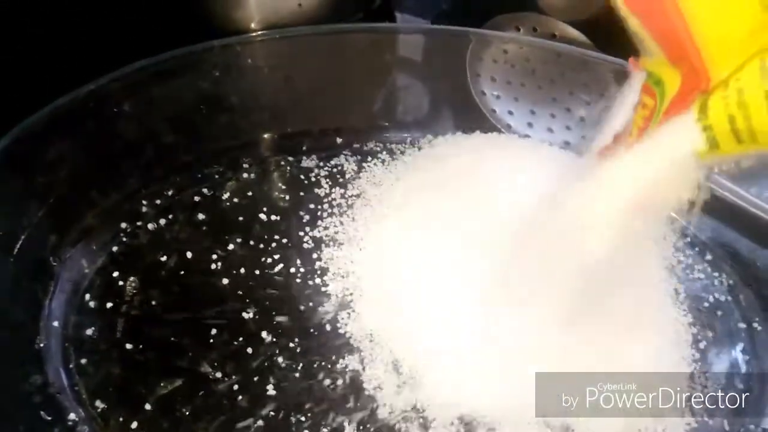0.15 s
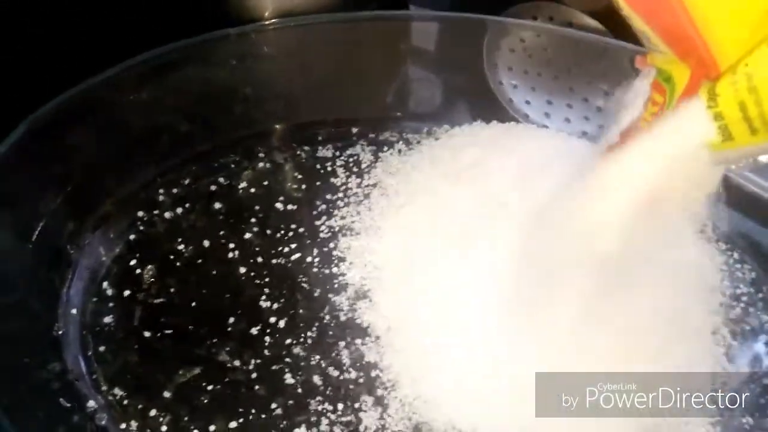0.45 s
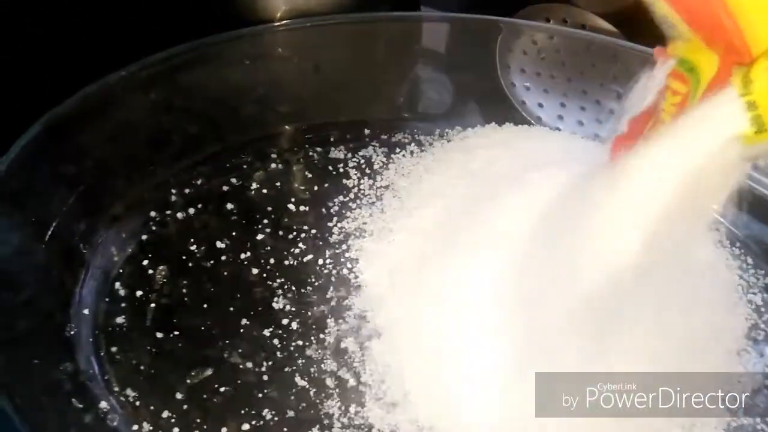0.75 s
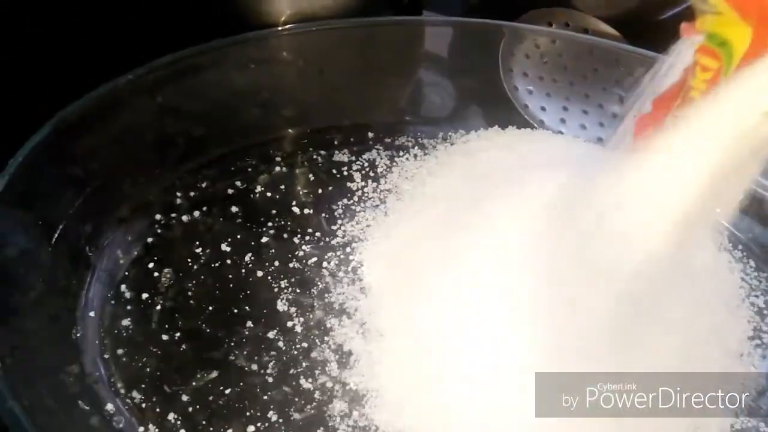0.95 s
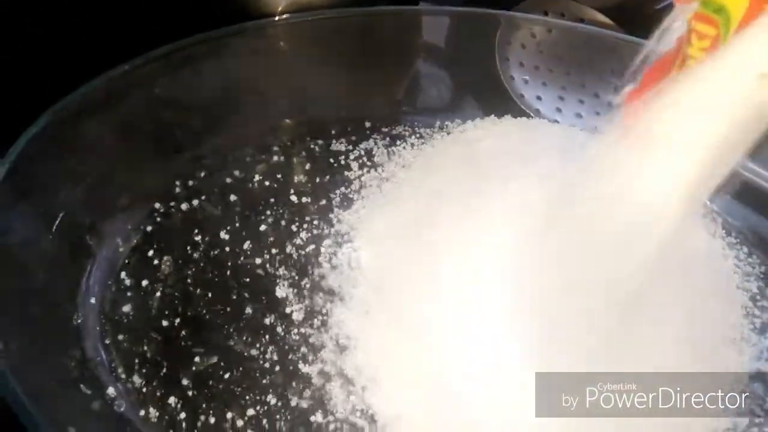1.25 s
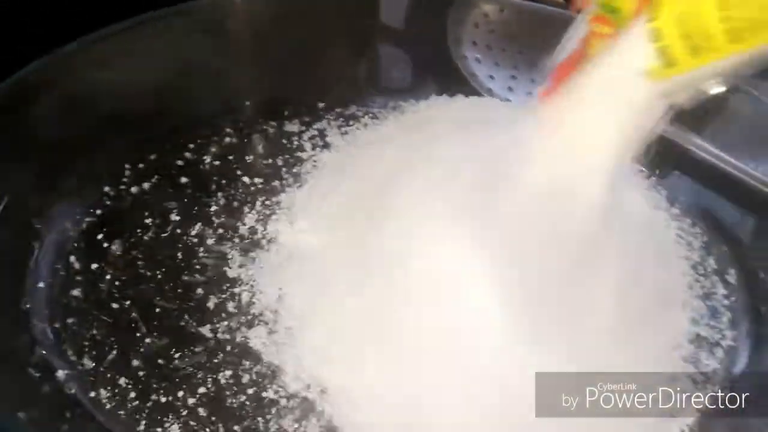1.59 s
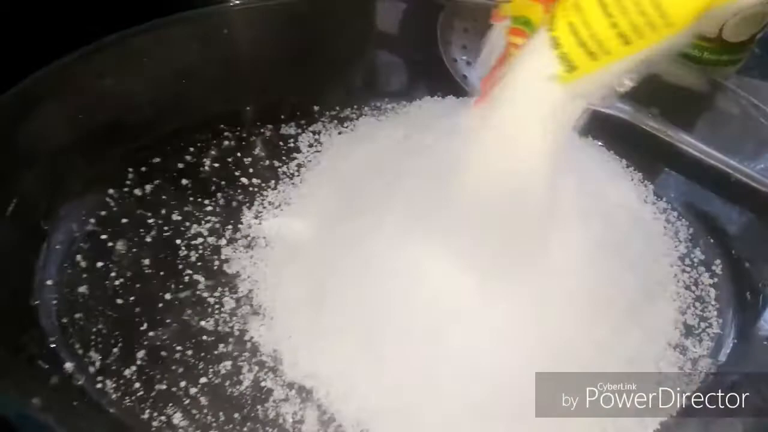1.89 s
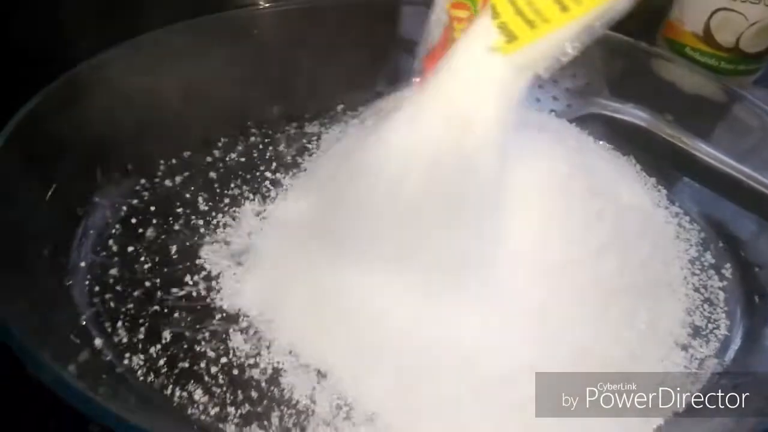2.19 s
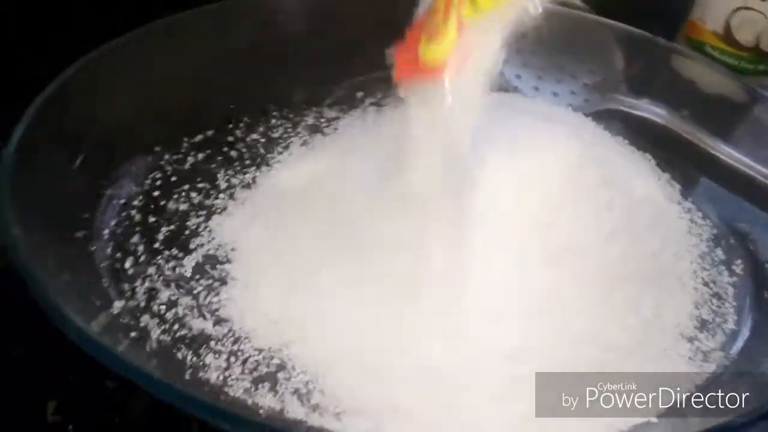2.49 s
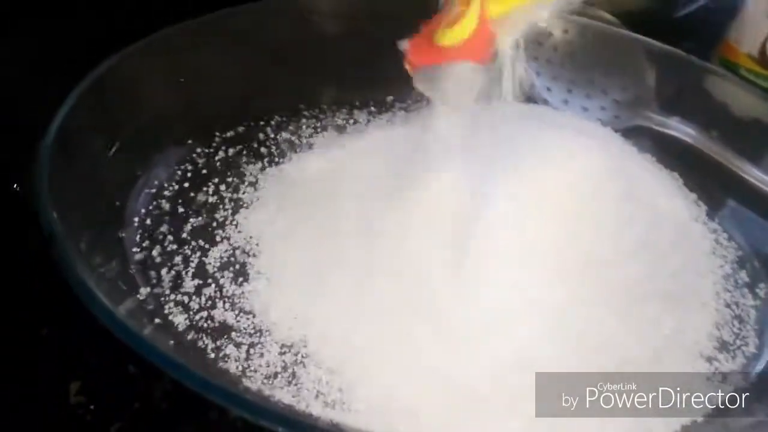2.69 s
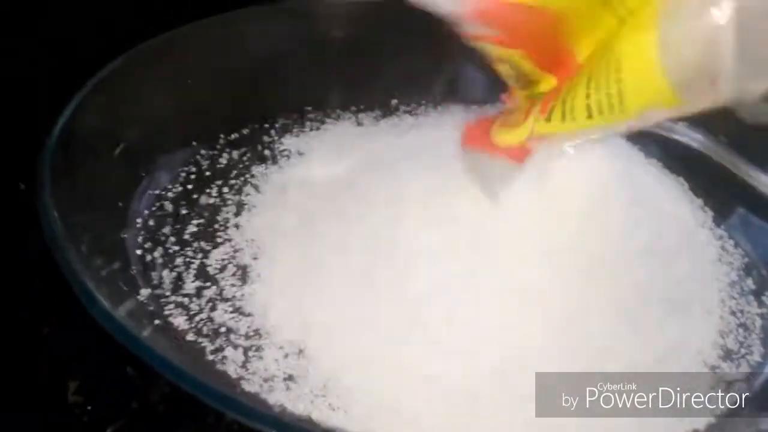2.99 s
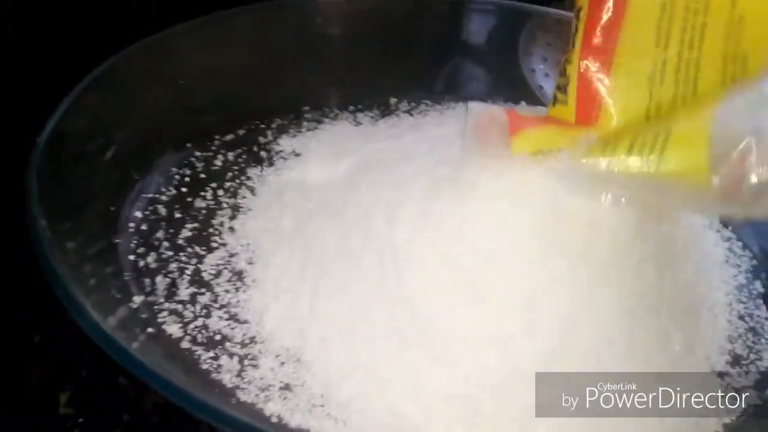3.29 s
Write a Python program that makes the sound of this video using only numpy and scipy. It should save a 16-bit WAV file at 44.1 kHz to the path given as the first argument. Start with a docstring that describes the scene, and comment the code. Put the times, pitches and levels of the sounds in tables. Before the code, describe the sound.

Hard little granules pour from a plastic packet into a glass bowl, close and mono. A dense, bright, grainy hiss swells slightly until 0.8 s, its tone shifting as the heap grows, with small plastic snaps at 0.2 and 0.8 s. After 2.5 s it thins raggedly; shaken spurts burst around 3.0-3.2 s, then a sharp packet snap, dull bumps and fading patter by 3.4 s. Faint rustle and low kitchen hum lie beneath.

```python
"""Pellets poured into a glass bowl

Small hard pellets pour from a plastic packet onto a growing heap, close to a mono microphone. Random clicks,
up to thousands a second, merge with smooth rolling noise into a hiss; filters crossfaded with the heap give
the changing notches of the bowl's echoes. At the end the packet is shaken and the last pellets leave in spurts.
Damped sines make its snaps and bumps, filtered noise its rustle and the low hum of the kitchen."""
import sys
import numpy as np
from scipy import signal
from scipy.io import wavfile
from scipy.ndimage import uniform_filter1d

SR = 44100
rng = np.random.default_rng(int(sys.argv[2]) if len(sys.argv) > 2 else 0)


def gain_from_db(level_db):
    """Turn a decibel level (scalar or array-like) into a linear amplitude factor."""
    decades = np.asarray(level_db, float) / 20
    return 10 ** decades


def waveform_to_disk(signal):
    """Save audio, clipped to [-1, 1], as 16-bit WAV at the path in sys.argv[1]."""
    frames = np.transpose(np.atleast_2d(signal))
    scaled = np.clip(frames, -1, 1) * 32767
    samples = np.round(scaled).astype(np.int16)
    wavfile.write(sys.argv[1], SR, samples)


N = 152145


def evened(x):
    """Scales to rms 1."""
    return x / np.sqrt(np.mean(x ** 2) + 1e-20)


def along(rows):
    """Reads the columns of a curve at every sample."""
    s, *columns = np.transpose(rows)
    return [np.interp(np.arange(N) / SR, s, c) for c in columns]


def colour(x, points, size=4096):
    """Causal minimum-phase filter of unit energy with the given spectrum."""
    point_hz, point_db = np.transpose(points)
    hz = abs(np.fft.fftfreq(size, 1 / SR))
    db = np.interp(np.log(hz + 1), np.log(point_hz + 1), point_db)
    log_gain = np.log(gain_from_db(np.maximum(db, -100)))
    # the Hilbert transform of the log gain gives the phase
    response = np.exp(np.conj(signal.hilbert(log_gain)))
    taps = np.fft.ifft(response).real[:size // 2]
    return signal.oaconvolve(x, taps / np.linalg.norm(taps))[:N]


def drift(hz):
    """Slow random curve of rms 1: noise through two one-pole low-passes at hz."""
    b, a = signal.butter(1, hz, fs=SR)
    once = signal.lfilter(b, a, rng.standard_normal(N))
    return evened(signal.lfilter(b, a, once))


def patchy(patch_db):
    """Noise whose level drifts in patches of time and pitch."""
    real, imag, patch = rng.standard_normal((N // 128 + 5, 257, 3)).T
    patch = uniform_filter1d(patch, size=6, axis=0)  # over pitch
    patch = evened(uniform_filter1d(patch, size=16, axis=1))  # over time
    spectrum = (real + 1j * imag) * gain_from_db(patch_db * patch)
    return evened(signal.istft(spectrum, nperseg=512, noverlap=384)[1][:N])


def hum():
    """Low lumpy rumble of the kitchen: low-filtered noise of drifting level."""
    # spectrum of the rumble: hz, relative level_db per Hz
    hum_colour = [(12, -48), (30, -12), (59, 5), (75, -0.5), (97, -8), (140, -10.5), (200, -18.5),
                  (260, -30), (440, -120)]
    level_db, lump_db, lump_hz = -67.5, 3, 3.7
    lumpy = rng.standard_normal(N) * gain_from_db(lump_db * drift(lump_hz))
    return gain_from_db(level_db) * evened(colour(lumpy, hum_colour, size=16384))


def handling():
    """Low lumpy rustle of the packet in the hand: filtered noise, its bottom lifted separately."""
    # rustle level before the bottom lift: time_s, level_db
    rustle_level = [(0.0, -64.5), (0.15, -76), (0.19, -64.5), (0.59, -61), (1.18, -68), (1.58, -61),
                    (2.05, -75), (2.13, -69.5), (2.91, -72.5), (3.17, -58.5), (3.4, -61.5), (3.45, -63.5)]
    # rustle spectrum: hz, relative level_db per Hz
    rustle_colour = [(53, -25), (90, -11.5), (270, -2), (306, -1), (351, -4.5), (525, 0.5), (614, -7),
                     (800, -0.5), (1040, -15), (1760, -120)]
    # lift of the rustle's bottom: time_s, lift_db
    bottom_lift = [(0, 3.5), (.7, -11), (1.1, 3.5), (1.6, 4), (2.3, 5), (2.8, 1), (3.45, 5)]
    patch_db, lump_db, lump_hz, split_hz = 2.9, 3, 7.2, 226
    lumpy = patchy(patch_db) * gain_from_db(lump_db * drift(lump_hz))
    rustle = evened(colour(lumpy, rustle_colour))
    low = signal.oaconvolve(rustle, signal.firwin(1025, split_hz, fs=SR), "same")
    level_db, lift_db = along(rustle_level)[0], along(bottom_lift)[0]
    return gain_from_db(level_db) * (rustle - low + low * gain_from_db(lift_db))


def thumps():
    """Dull bumps of the packet: low sines that rise softly and decay exponentially."""
    # bumps: start_s, level_db before the soft rise, pitch_hz, t60_s
    bumps = [(1.914, -58, 306, 0.089), (2.108, -53.5, 291, 0.093), (2.665, -50.5, 75.5, 0.19),
             (3.28, -48.5, 240, 0.065), (3.358, -46, 305, 0.094), (3.383, -58, 202, 0.069)]
    rise_s = 0.0074
    out, t = np.zeros(N), np.arange(SR // 5) / SR
    for start_s, level_db, pitch_hz, t60_s in bumps:
        decay = gain_from_db(level_db - 60 * t / t60_s)
        bump = decay * np.sin(2 * np.pi * pitch_hz * t) * np.minimum(t / rise_s, 1)
        part = out[round(start_s * SR):][:len(t)]
        part += bump[:len(part)]
    return out


def snaps():
    """Snapping folds of the packet ring the same few damped modes; thin film radiates no bass."""
    # folds: start_s, level_db (scales half the sum of the modes), pitch_hz, t60_s
    folds = [(.1988, -27, 987, .013), (.7790, -27.5, 1000, .012), (3.3295, -37, 1400, .012),
             (3.3346, -27.5, 1100, .009), (3.383, -39, 1500, .02), (3.387, -39, 1480, .03)]
    # modes of a fold: multiple of pitch_hz, relative level_db
    modes = [(.95, 2), (1.3, -1), (1.7, 1), (2.2, 3), (2.7, 0), (3.1, 1), (3.8, -9)]
    rise_s, bottom_hz = .0002, 800
    out, t = np.zeros(N), np.arange(2000) / SR
    for start_s, level_db, pitch_hz, t60_s in folds:
        ring = sum(gain_from_db(mode_db - 60 * t / t60_s) * np.sin(2 * np.pi * multiple * pitch_hz * t)
                   for multiple, mode_db in modes)
        ring = gain_from_db(level_db) * ring * np.minimum(t / rise_s, 1) / 2
        part = out[round(start_s * SR):][:len(t)]
        part += ring[:len(part)]
    return signal.sosfilt(signal.butter(4, bottom_hz, "high", fs=SR, output="sos"), out)


def bright(x):
    """Adds a moving resonance: shift down, smooth, shift back."""
    # narrow band, mostly climbing as the heap nears the packet: time_s, centre_hz, gain_db
    band = [(1.6, 5900, -6), (1.95, 5670, -6), (2.3, 6100, 7), (2.55, 6510, 1), (2.72, 6560, -6),
            (2.8, 6500, -25)]
    width_hz = 94
    centre_hz, gain_db = along(band)
    turn = np.exp(2j * np.pi * np.cumsum(centre_hz) / SR)
    pole = np.exp(-np.pi * width_hz / SR)
    smooth = signal.lfilter([1 - pole], [1, -pole], x / turn)
    return x + gain_from_db(gain_db) * 2 * (turn * smooth).real


def stream():
    """Clumped clicks of falling pellets plus rolling hiss, coloured by the state of the heap."""
    # heap: time_s, stage (0 low, 1 rising, 2 high, 3 packet lowered onto it, 4 packet nearly empty)
    heap_stage = [(0, 0), (1.2, 0.54), (1.6, .5), (1.95, 1.0), (2.15, 1.2), (2.35, 1.95), (2.7, 2),
                  (2.85, 3), (3.0, 3), (3.24, 3), (3.28, 3.5), (3.45, 4)]
    # steady pour, then spurts: time_s, level_db before colouring, lift_db of the lower mids
    steady = [(0, -37, -0.5), (.1, -35, -2), (.2, -34, -0.5), (.5, -33, 0), (.8, -31.5, 0.5),
              (1.3, -32.5, 1.5), (1.8, -33.5, 3), (2.2, -34.5, 0.5), (2.45, -35, -3)]
    spurts = [(2.52, -35.5, -1), (2.56, -37, -0.5), (2.62, -40.0, -1), (2.66, -36.5, -1.5),
              (2.72, -40.5, 2.5), (2.745, -44.5, 1.5), (2.78, -47.5, 3), (2.81, -43, 0.5), (2.84, -43.5, 5),
              (2.867, -38, -2), (2.895, -40.5, 2.0), (2.91, -46.5, 2.5), (2.935, -52.5, 6),
              (2.955, -48.5, 5), (2.975, -36, 4), (3.0, -39, 2), (3.025, -31, 1.5), (3.05, -31, -4),
              (3.075, -36, 0.5), (3.11, -40.5, 1.5), (3.133, -39, 1), (3.147, -27.5, 0.5),
              (3.18, -30, -2.5), (3.225, -36.0, 2), (3.246, -43, 0.5), (3.275, -43.5, -1),
              (3.285, -38.5, 0), (3.305, -37, -2), (3.325, -39, -1), (3.346, -43.5, 3), (3.378, -44, 1),
              (3.386, -42.5, 8.5), (3.402, -47.5, 0.5), (3.42, -54, 4), (3.435, -50, 5), (3.45, -57, 4)]
    # colour of a click at the microphone, one table per stage: hz, relative level_db per Hz
    low_heap = [(120, -60), (200, -51), (320, -21.5), (419, -24), (451, -25), (581, -25.5), (912, -12.5),
                (1490, -14.5), (2060, -8), (2510, -15), (2900, -9), (3290, -12), (3600, -5.5), (4240, -5.5),
                (4640, -7.5), (5760, 0), (8410, -19), (14300, -27)]
    rising_heap = [(120, -68), (200, -36), (309, -23), (419, -44), (443, -50), (761, -34), (880, -13.5),
                   (1090, -22.5), (1170, -16), (1510, -14), (1630, -21), (1880, -15.5), (2170, -10),
                   (3350, -13.5), (4310, -0.5), (5760, 2.5), (8410, -15.5), (14300, -25.5)]
    high_heap = [(120, -53), (200, -24), (300, -45), (430, -51), (540, -17.5), (620, -29.5), (770, -28.5),
                 (950, -14.5), (1150, -15.5), (1270, -24.5), (1400, -11), (1650, -10.5), (1980, -21),
                 (2400, -2), (2800, -10.5), (3300, -3), (3750, -10.5), (4750, 0.5), (5500, -1),
                 (6300, -3.5), (7300, -13.5), (14300, -30)]
    packet_down = [(120, -39), (200, -28), (412, -32.5), (530, -19.5), (613, -30), (880, -22.5),
                   (946, -9.5), (1050, -15), (1150, -10.5), (1260, -16.5), (1490, -5.5), (1980, -13),
                   (2350, 1.5), (2700, -7.5), (3170, -3.5), (3950, -8.5), (4650, 0.5), (5100, -3.5),
                   (5550, 2.5), (6300, -4), (7150, -11), (14300, -29)]
    packet_empty = [(290, -42), (540, -11), (626, -22), (927, -20), (1140, -5.5), (1500, -1), (2100, -6),
                    (2500, -11), (2800, -8), (3190, -5), (3930, -12), (4700, -12), (5300, -5), (5750, -1),
                    (6800, -11.5), (14300, -29)]
    full_clicks_per_s, full_db = 9000, -36
    thin_db_per_decade = 30  # below full_db, ten times fewer clicks for each such drop
    size_db, clump_db, clump_hz = 1, 0.58, 39.7
    slide_db, patch_db = -2, 1.5  # hiss of pellets rolling down the heap, relative to the clicks
    mids_top_hz = 3670

    level_db, lift_db = along(steady + spurts)
    stage = np.clip(along(heap_stage)[0], 0, 4)
    hit, size, sign = rng.random((N, 3)).T
    share = 10 ** (np.minimum(level_db - full_db, 0) / thin_db_per_decade)
    hits = (hit < share * full_clicks_per_s / SR) / np.sqrt(share)  # fewer but stronger
    clicks = hits * gain_from_db(-size_db * np.log(size + 0.0042)) * np.sign(sign - .5)

    mixed = evened(clicks) + gain_from_db(slide_db) * patchy(patch_db)
    drive = evened(mixed * gain_from_db(clump_db * drift(clump_hz))) * gain_from_db(level_db)

    # crossfade between neighbouring stages
    colours = (low_heap, rising_heap, high_heap, packet_down, packet_empty)
    out = sum(colour(drive * np.maximum(1 - abs(stage - k), 0), c) for k, c in enumerate(colours))
    mids = signal.oaconvolve(out, signal.firwin(129, mids_top_hz, fs=SR), "same")
    return out - mids + mids * gain_from_db(lift_db)


def scene():
    """One microphone feeds both channels."""
    mix = bright(stream()) + snaps() + thumps() + handling() + hum()
    return np.array([mix, mix])


def band_limit(x):
    """A steep low-pass at the top of the band."""
    return signal.sosfilt(signal.butter(12, 14240, fs=SR, output="sos"), x)


def record(dry):
    """Turns the finished mix into the output."""
    return band_limit(dry)


dry = scene()
out = record(dry)
waveform_to_disk(out)
```